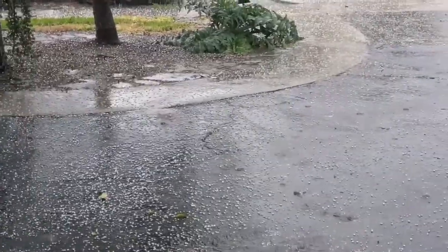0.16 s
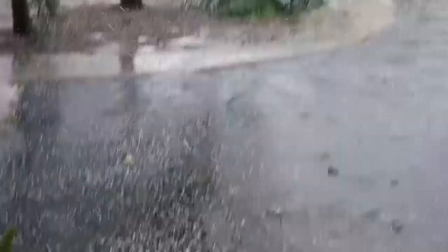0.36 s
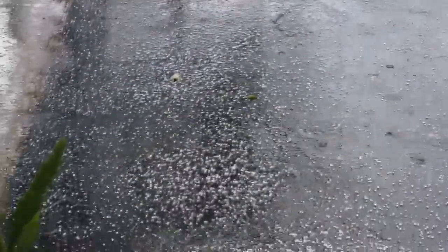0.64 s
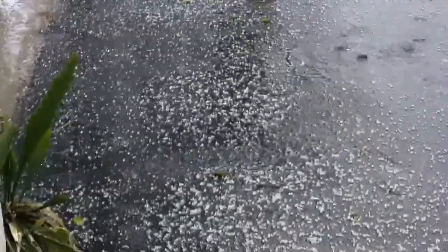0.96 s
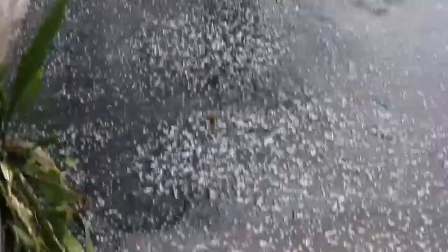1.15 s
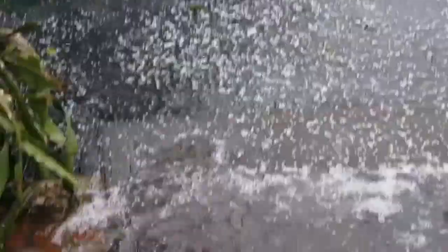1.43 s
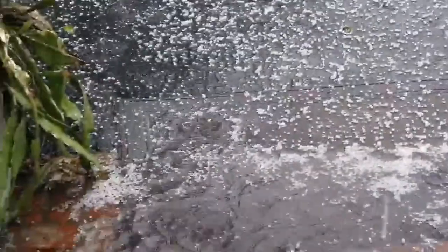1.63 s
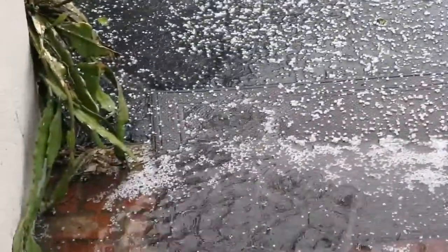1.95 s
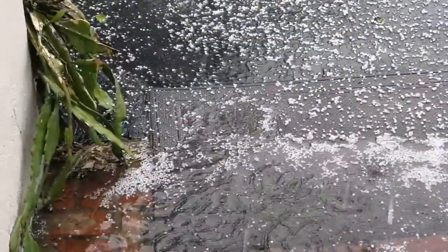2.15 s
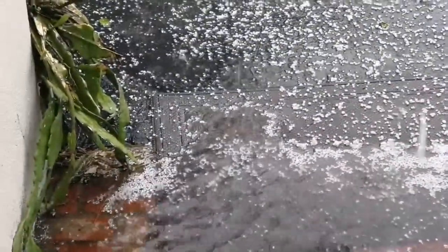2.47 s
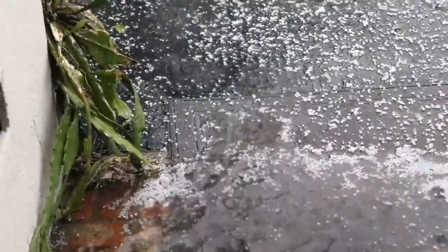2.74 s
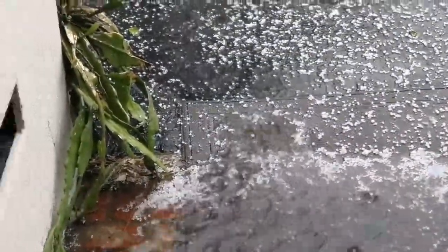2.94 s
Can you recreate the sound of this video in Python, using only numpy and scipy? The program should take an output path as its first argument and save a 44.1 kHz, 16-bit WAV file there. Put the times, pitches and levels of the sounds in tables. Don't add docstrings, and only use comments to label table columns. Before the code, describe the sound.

Dense hail and rain shower on pavement, hissing evenly with nearby ticks and a few pings.

```python
import sys
import numpy as np
from scipy import signal
from scipy.fft import rfft, irfft, next_fast_len
from scipy.io import wavfile
from scipy.ndimage import uniform_filter1d, map_coordinates

SR = 44100
rng = np.random.default_rng(int(sys.argv[2]) if len(sys.argv) > 2 else 0)


def volts(x):
    e = np.asarray(x, float) / 20
    return 10 ** e


def pcm_store(signal):
    levels = np.round(np.clip(np.atleast_2d(signal), -1, 1) * 32767)
    wavfile.write(sys.argv[1], SR, levels.astype(np.int16).T)


N = 136710


def unit(x):
    return x / np.sqrt(np.mean(x ** 2) + 1e-20)


def along(points, hz):
    f, v = np.transpose(points)
    return np.interp(np.log(hz + 1), np.log(f + 1), v)


def curve(rows):
    s, v = np.transpose(rows)
    return np.interp(np.arange(N) / SR, s, v)


def wobble(rate):
    return map_coordinates(rng.standard_normal(200), [np.arange(N) * rate / SR])


def filtered(x, response):
    m = next_fast_len(N + 8192)
    return irfft(rfft(x, m) * response(np.fft.rfftfreq(m, 1 / SR)), m)[..., :N]


def rush(spectrum, patchy_db):
    # f/Hz, correlation
    likeness = [(25, 0.92), (130, 0.97), (290, 0.93), (500, 0), (750, 0), (1300, 0.32), (2400, 0),
                (15000, 0.056)]
    z = signal.stft(rng.standard_normal((2, N)), nperseg=256)[2]
    field = rng.standard_normal(z.shape[1:])
    for axis in (0, 1):
        field = uniform_filter1d(field, size=8, axis=axis)
    pair = signal.istft(z * volts(patchy_db * unit(field)), nperseg=256)[1][:, :N]

    def shaped(hz):
        angle = np.arccos(np.clip(along(likeness, hz), -1, 1)) / 2
        return volts(along(spectrum, hz)) * [np.cos(angle), np.sin(angle)]

    mid, side = filtered(pair, shaped)
    return unit(np.array([mid + side, mid - side]))


def grains(count, centre_hz, spread, cycles, uneven_db, left_db, scatter_db, size=96):
    when = rng.random(count)
    pitch, side = rng.standard_normal((2, count))
    far = rng.random((2, count))
    hz = np.clip(centre_hz * np.exp(spread * pitch), 700, 15000)[:, None]
    t = np.arange(size) / SR
    strength_db = uneven_db * np.minimum(rng.exponential(size=(count, 1)), 4)
    drop = np.sin(2 * np.pi * hz * t) * np.exp(-t * hz / cycles) * volts(strength_db)
    drop *= rng.choice([-1, 1], (count, 1))
    lean_db = left_db + scatter_db * np.clip(side, -2, 2)
    out = []
    for sign, lag in zip((.5, -.5), far):
        at = (when * N + 30 * lag).astype(int)[:, None] + np.arange(size)
        heard = drop * volts(sign * lean_db)[:, None]
        out.append(np.bincount(at.ravel(), heard.ravel(), N + SR)[:N])
    return unit(np.array(out))


def rain():
    # t/s, level/dB
    shower = [
        (0.0, -34.5),
        (0.9, -34),
        (1.93, -35.5),
        (2.42, -35),
        (2.78, -35.5),
        (3.1, -35.5),
    ]
    # f/Hz, level/dB
    hiss_spectrum = [(1120, -57), (1900, -6), (2290, -6), (3250, 0.5), (5100, 0), (8500, -6.5),
                     (15600, -19.5)]
    # f/Hz, level/dB
    patter_spectrum = [(250, -35), (420, -10.5), (615, -5.5), (659, -5), (1070, 1), (1300, -4), (1570, 0.5),
                       (2220, -9), (2600, -9.5), (3380, -19), (5720, -120)]
    hiss_db, patter_db, spray_db, crackle_db, drip_db, swell_db = 2, -6, -7, -14.5, -15.5, 0.7

    hiss = volts(hiss_db) * rush(hiss_spectrum, patchy_db=1.28)
    patter = volts(patter_db) * rush(patter_spectrum, patchy_db=1.5)
    spray = grains(count=9000, centre_hz=4500, spread=0.43, cycles=1.1,
                   uneven_db=1.5, left_db=6, scatter_db=4.5)
    crackle = grains(count=1500, centre_hz=7000, spread=.35, cycles=1.4,
                     uneven_db=5.5, left_db=24, scatter_db=3.5)
    drips = grains(count=500, centre_hz=2400, spread=.55, cycles=12,
                   uneven_db=2, left_db=2, scatter_db=4, size=900)
    near = volts(spray_db + .8 * wobble(14)) * spray
    near += volts(crackle_db + 1.0 * wobble(16)) * crackle
    swell = volts(swell_db * wobble(23.86))
    return volts(curve(shower)) * (swell * (hiss + near) + patter + volts(drip_db) * drips)


def roof():
    # f/Hz, level/dB
    hum_spectrum = [(50, -53), (85, -19), (134, 0), (195, 0), (241, -12), (286, -1.5), (330, -4), (387, -5),
                    (560, -16), (730, -47), (1230, -120)]
    # t/s, level/dB
    drumming = [
        (0.08, -43.5),
        (0.23, -40.5),
        (0.71, -46),
        (2.14, -46.5),
        (2.21, -45.5),
        (2.51, -47.5),
        (2.54, -42),
        (2.58, -45),
        (3.01, -48),
        (3.1, -45.5),
    ]
    # f/Hz, level/dB, t60/s
    panel_modes = [
        (142.5, -23, 0.2),
        (213.4, -27, 0.18),
        (352, -41, 0.4),
        (105, -50, 0.089),
    ]
    knock_db, width_hz = -5, 19

    t, blows = np.arange(N) / SR, np.zeros(N)
    when, size = rng.random((2, 500))
    blows[(when * N).astype(int)] = volts(8.3 * size)

    def panels(f):
        damping = 1j * f * width_hz
        return sum(volts(db) * damping / (hz * hz - f * f + damping) for hz, db, t60 in panel_modes)

    hum = rush(hum_spectrum, patchy_db=0.2) + volts(knock_db) * unit(filtered(blows, panels))
    thud = sum(volts(db - 60 * t / t60) * np.cos(2 * np.pi * hz * t + 0.93) for hz, db, t60 in panel_modes)
    return volts(curve(drumming) - 1.5 + 0.92 * wobble(13)) * hum + thud


def wind():
    # t/s, level/dB
    gusts = [(0.0, -49), (0.03, -58), (0.22, -43.5), (0.75, -56), (0.79, -50), (0.85, -52.5), (1.78, -54.5),
             (1.92, -46), (1.95, -61), (2.06, -45), (2.26, -56), (2.3, -48.5), (2.42, -56.5), (3.1, -56)]
    # f/Hz, level/dB
    rumble = [(12, -16), (26, 2), (45, -2.5), (86, -13), (120, -9), (200, -60)]
    return volts(curve(gusts)) * rush(rumble, patchy_db=3.8)


def splashes():
    # t/s, peak level at the left/dB, pitch f/Hz, spray level relative to the crack/dB
    big_drops = [(.0963, -19, 4500, -14), (.2997, -25, 5840, -11), (0.4247, -16, 5000, -9),
                 (0.545, -29, 10800, -12), (.6597, -17, 7000, -14), (0.763, -24, 8500, -15),
                 (0.8095, -18, 6550, -13), (1.208, -22, 13000, -7), (1.3907, -25, 11000, -7),
                 (1.4636, -23, 9450, -9), (1.513, -24, 11000, -8), (1.6568, -21, 10900, -9),
                 (1.9624, -15, 7500, -15), (2.0597, -17.5, 8000, -11), (2.3331, -24, 12500, -9),
                 (2.414, -33, 8940, 4), (2.485, -21, 10500, -9), (2.6792, -19, 12300, -7),
                 (2.7317, -24, 10000, -12), (2.8295, -22, 6600, -17), (2.8572, -21, 12500, -9),
                 (2.9705, -22, 7000, -11), (2.98, -20, 6000, -11), (3.0245, -27, 5500, -17),
                 (3.0364, -19, 7000, -7), (3.051, -25, 9500, -16)]
    crack_cycles, rise_s, fall_s, left_db = 1.3, .005, .012, 12

    out, t = np.zeros((2, N + SR)), np.arange(-1024, 3072) / SR
    f, after = np.fft.rfftfreq(len(t), 1 / SR), np.maximum(t, 0)
    burst = np.where(t < 0, np.exp(t / rise_s), np.exp(-t / fall_s))
    for s, db, hz, spray_db in big_drops:
        envelope = (1 - np.exp(-after * hz)) * np.exp(-after * hz / crack_cycles)
        crack = -3 * np.sin(2 * np.pi * hz * after) * envelope
        band = np.exp(-(np.log((f + 1) / hz) / 0.58) ** 2)
        noise = irfft(rfft(rng.standard_normal((2, len(t)))) * band)
        spray = volts(spray_db - 5 - hz / 5000) * unit(noise) * burst
        place = out[:, round(s * SR) - 1024:][:, :len(t)]
        place += volts(db) * (crack + spray) * volts([[0], [-left_db]])
    return out[:, :N]


def porch(x, length):
    # f/Hz, t60/s
    decay = [(200, 0.53), (2000, 0.41), (4500, .24), (12000, 0.18)]
    hz, t, z = signal.stft(rng.standard_normal((2, SR // 4)), SR, nperseg=128)
    tail = signal.istft(z * volts(-60 * t / along(decay, hz)[:, None]), SR, nperseg=128)[1]
    late = np.pad(x, (40, 0))[None]
    return signal.fftconvolve(late, tail / np.linalg.norm(tail[0]), axes=1)[:, :length]


def pings():
    # t/s, peak level/dB, pitch f/Hz, spread of the modes/share of pitch
    stones = [(.302, -19.5, 5050, 0.29), (.658, -22, 2710, 0.051), (1.2103, -24, 3840, .06),
              (1.516, -23, 3650, 0.21), (2.0362, -23, 4690, .2), (2.2148, -24, 3800, 0.22),
              (2.3767, -11, 4150, .1), (2.5187, -25.5, 5040, 0.11), (2.537, -25, 4000, 0.202),
              (2.659, -31, 4500, 0.28), (2.856, -27, 4700, 0.21), (2.9796, -19.5, 4080, .33)]
    t60_s, rise_s, echo_db = 0.031, 0.0013, 2

    out, t = np.zeros((2, N + SR)), np.arange(SR // 10) / SR
    for s, db, hz, spread in stones:
        off, size, phase = rng.standard_normal((3, 9, 1))
        place = np.linspace(-1, 1, 9)[:, None] + off / 10
        mode_hz = hz * np.exp(1.7 * spread * place)
        modes = volts(0.5 * size - 12 * place ** 2) * np.sin(2 * np.pi * mode_hz * t + 3 * phase)
        ring = volts(db - 60 * t / t60_s) * (1 - np.exp(-t / rise_s)) * modes.sum(0) / 2.4
        heard = out[:, round(s * SR):]
        heard[:, :len(t)] += ring * volts([[1.5], [-9]])
        heard[:, :SR // 4] += porch(ring, SR // 4) * volts([[echo_db - 4.5], [echo_db]])
    return out[:, :N]


def scene():
    return rain() + roof() + wind() + splashes() + pings()


def roll_off(x):
    return signal.sosfilt(signal.butter(12, 15770, fs=SR, output="sos"), x)


def record(dry):
    # f/Hz, left-right level/dB
    ports = [(60, -1.5), (130, 0), (290, -2.5), (640, -3), (1410, -2.5), (3100, -3.5), (6820, -1),
             (15000, 5.5)]
    low_cut_hz = 5

    def response(hz):
        return volts(along(ports, hz) * [[.5], [-.5]]) * hz / (hz + low_cut_hz)

    return roll_off(filtered(dry, response))


dry = scene()
out = record(dry)
pcm_store(out)
```